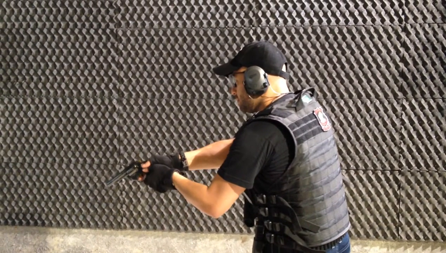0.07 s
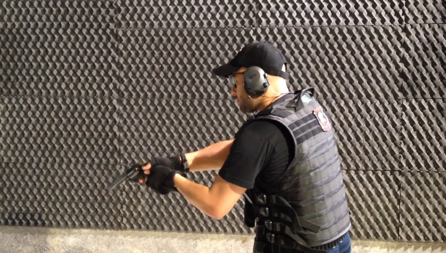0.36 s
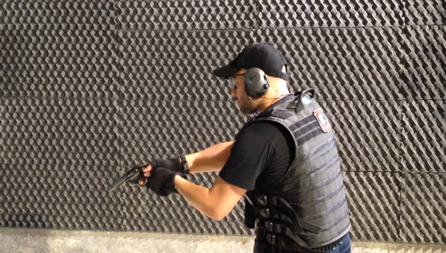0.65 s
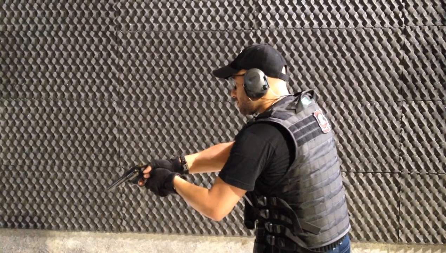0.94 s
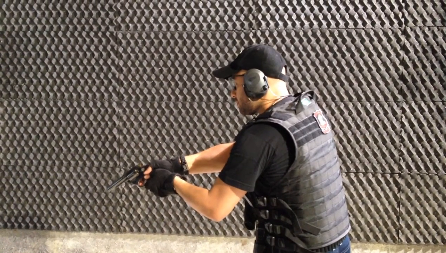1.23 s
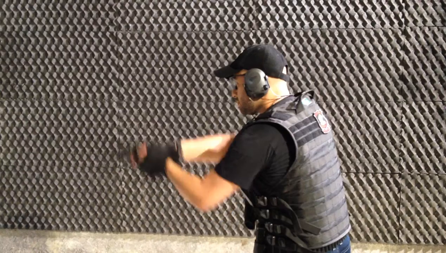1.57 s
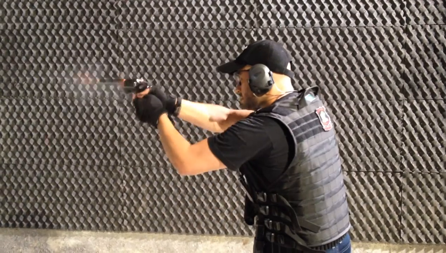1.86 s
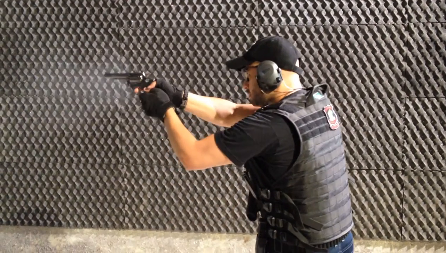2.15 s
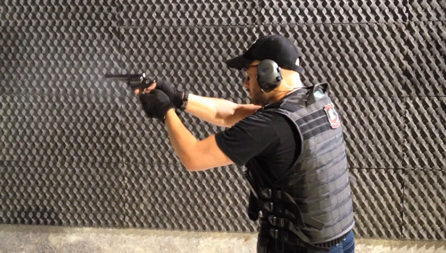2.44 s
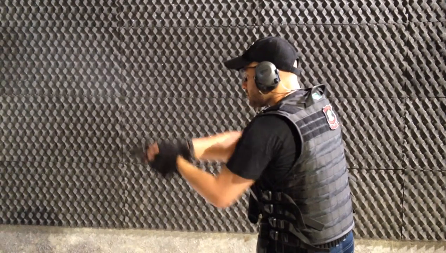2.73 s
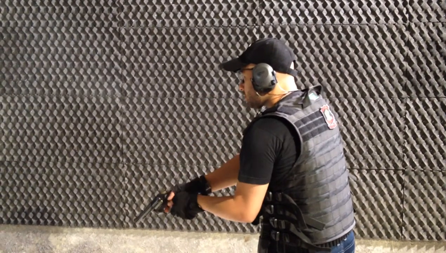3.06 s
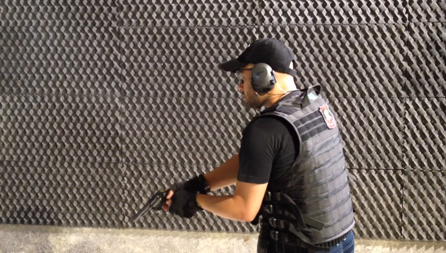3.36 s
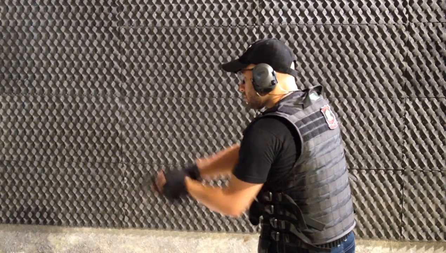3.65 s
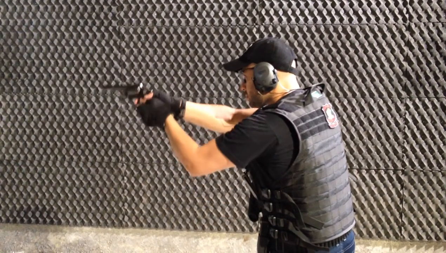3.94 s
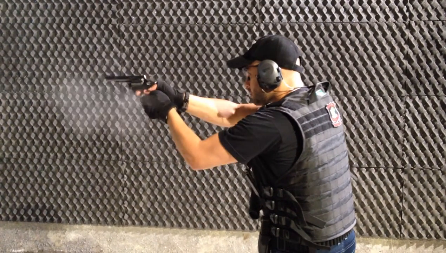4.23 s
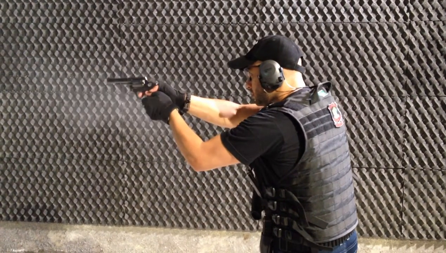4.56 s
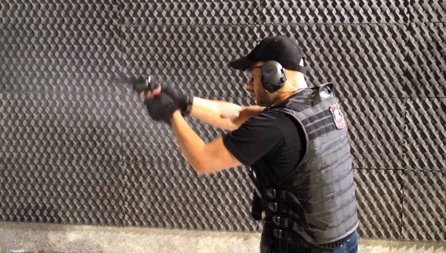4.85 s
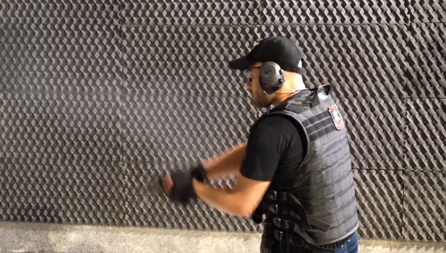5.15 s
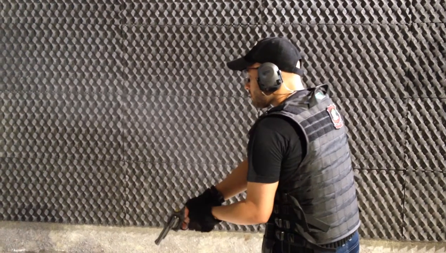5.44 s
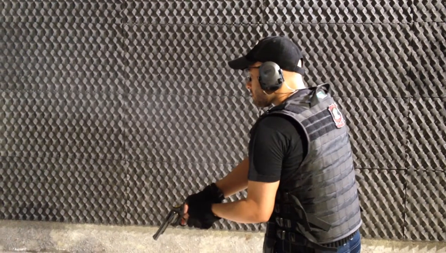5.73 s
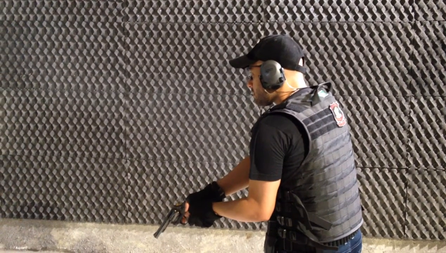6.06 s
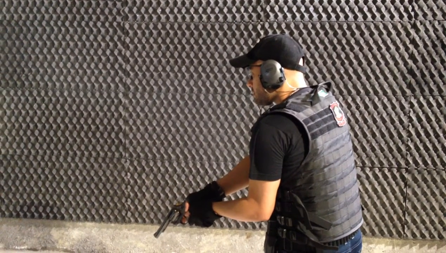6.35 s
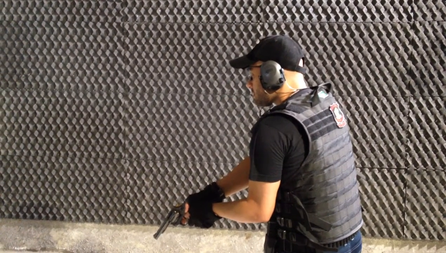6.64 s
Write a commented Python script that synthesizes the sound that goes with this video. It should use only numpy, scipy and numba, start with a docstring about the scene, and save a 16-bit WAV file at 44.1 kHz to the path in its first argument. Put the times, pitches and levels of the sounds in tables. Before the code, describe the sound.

A revolver fires once, then three times in quick succession, each blast echoing through an indoor range over steady ventilation.

```python
"""Revolver in an indoor range

One shot, then three in a row, over the steady rush of the ventilation. The hammer clicks just
before each blast; nearby surfaces throw the blast back, then the long hall swells and dies away.
The small microphone rings and overloads; its gain control turns the sound down, then slowly up."""
import sys
import numpy as np
from scipy import signal
from scipy.fft import rfft, irfft
from scipy.io import wavfile
from scipy.ndimage import uniform_filter1d
from numba import njit

SR = 44100
rng = np.random.default_rng(int(sys.argv[2]) if len(sys.argv) > 2 else 0)


def generate_wav(signal):
    """Clip the signal to [-1, 1] and save it as 16-bit WAV at the path in sys.argv[1]."""
    frames = np.transpose(np.atleast_2d(signal))
    scaled = np.clip(frames, -1, 1) * 32767
    pcm = np.round(scaled).astype(np.int16)
    wavfile.write(sys.argv[1], SR, pcm)


N = 295029
TIME = np.arange(N) / SR

# Tone of the ventilation: (frequency [Hz], relative level [dB])
VENT_TONE = [(30, -102), (55, -91), (80, -85.5), (115, -66.5), (170, -71.5), (218, -57.5), (270, -66),
             (440, -67.5), (620, -74.5), (900, -75.5), (1500, -84), (2600, -86.5), (3700, -89),
             (5200, -114)]
# Slow rise and fall of the air flow: (time [s], level change [dB])
AIR_SWELL = [(0, 3), (1.0, 4), (1.8, 2.5), (3.1, 0), (3.9, -0.5), (5.9, -1.5), (6.7, 1)]
# Microphone hiss: (frequency [Hz], level [dB per Hz])
MIC_HISS = [(3000, -112), (6000, -110), (8700, -108), (11000, -112), (15500, -115)]
# The hall's lingering sound: (frequency [Hz], relative level [dB], time to fade 60 dB [s], build-up [s])
HALL_REVERB = [(50, -49, 0.6, .08), (89, -57, 1.2, .1), (130.8, -23.5, 1.16, 0.11),
               (210, -17.5, 1.314, 0.14), (430, -10, 1.058, 0.11), (694, -14.5, 0.9, 0.1),
               (990, -15.5, 0.94, 0.088), (1420, -28, 0.9, 0.031), (2500, -27, 0.79, 0.027),
               (3960, -29, 0.67, 0.016), (5400, -45, .62, 0.0085), (7600, -41, 0.53, .01),
               (10700, -48, 0.45, .01), (16000, -45.5, 0.31, .01)]
# Tones that ring between the hall's walls: (frequency [Hz], relative level [dB])
STANDING_WAVES = [(156.1, -42), (183.0, -49.5), (215.3, -23), (247.6, -49.5), (285.3, -23), (441.4, -40),
                  (570.6, -56), (656.8, -37.5), (732.1, -33), (915.2, -34.5), (1141, -37)]
# Tone of the echoes off the near walls and floor: (frequency [Hz], gain [dB])
ECHO_TONE = [(60, -20.5), (200, -8), (450, 1), (1200, 2), (2700, 1.5), (4000, 0.5), (5500, -10),
             (9000, -29.5), (15000, -19)]
# The four shots: (time [s], shot gain [dB], extra gain of the near echoes [dB])
SHOT_LIST = [(1.9033, -0.5, -4.5), (4.0506, -1, -4.5), (4.3903, -1.5, -2), (4.7024, -1, -3.5)]


def from_db(db):
    """Turn decibels into a factor to multiply by."""
    return 10 ** (np.asarray(db) / 20)


def look_up(hz, table, column=1):
    """Read between a table's rows, with frequency spaced in octaves."""
    table = np.array(table, float)
    return np.interp(np.log(np.maximum(hz, 1)), np.log(table[:, 0]), table[:, column])


def white_noise(count):
    """Noise with a power of 1 per Hz."""
    return rng.standard_normal(count) * np.sqrt(SR / 2)


def shape_tone(x, table, size=8192):
    """Filter x with a table of (frequency [Hz], gain [dB])."""
    gains = from_db(look_up(np.fft.rfftfreq(size, 1 / SR), table))
    cepstrum = irfft(np.log(gains))
    # Fold it so the filter never rings before the sound arrives.
    cepstrum[1:size // 2] *= 2
    cepstrum[size // 2 + 1:] = 0
    response = irfft(np.exp(rfft(cepstrum)))
    return signal.fftconvolve(x, response)[:len(x)]


def fade(t, t60):
    """A smooth fade that is 60 dB down after t60 seconds."""
    return np.exp(-np.log(1000) * t / t60)


def add(out, start_s, x):
    """Mix x into out at the given time."""
    i = int(start_s * SR)
    out[i:i + len(x)] += x[:N - i]


def ventilation(flutter_db=1.27, smooth_samples=5000):
    """Air rushes through the ducts; its swirls make the level waver."""
    drift = uniform_filter1d(rng.standard_normal(N), smooth_samples)
    drift = uniform_filter1d(drift, smooth_samples)
    swell_db = np.interp(TIME, *np.transpose(AIR_SWELL))
    return shape_tone(white_noise(N), VENT_TONE) * from_db(swell_db + flutter_db * drift / drift.std())


def hall_reverb(standing_db=24, standing_t60=1.357, standing_build_s=0.17):
    """The hall answers a blast: low sounds arrive late and stay, high ones die first."""
    t = TIME[:2 * SR]
    octave = np.log2(np.maximum(np.fft.rfftfreq(len(t), 1 / SR), 1))
    spectrum, reverb = rfft(white_noise(len(t))), 0
    for centre in np.arange(5, 14.2, .25):  # bands a quarter of an octave apart
        hz = 2 ** centre
        band = irfft(spectrum * np.maximum(1 - 4 * abs(octave - centre), 0))
        db, t60, build_s = (look_up(hz, HALL_REVERB, column) for column in (1, 2, 3))
        build = 1 - np.exp(-(t / build_s) ** 2)
        reverb = reverb + band * from_db(db) * fade(t, t60) * build
    tones = sum(from_db(db) * np.sin(2 * np.pi * (hz * t + rng.random())) for hz, db in STANDING_WAVES)
    build = 1 - np.exp(-(t / standing_build_s) ** 2)
    return reverb + from_db(standing_db) * tones * fade(t, standing_t60) * build


def near_echoes(gain_db=17, per_second=700, scatter_gain=0.56, t60=.42):
    """The blast bounces back in separate slaps; scatter from foam wedges fills the gaps."""
    t = TIME[:SR // 2]
    chance = per_second / SR
    slaps = (rng.random(len(t)) < chance) * rng.standard_normal(len(t)) / np.sqrt(chance)
    scatter = scatter_gain * rng.standard_normal(len(t))
    return from_db(gain_db) * shape_tone(slaps + scatter, ECHO_TONE) * fade(t, t60)


def hammer_click(ring_hz=2230, ring_db=-20, ring_t60=.025, snap_db=-28, snap_t60=0.1):
    """The hammer hits the cartridge's primer: a steel ring and a dry snap."""
    t = TIME[:SR // 10]
    ring = from_db(ring_db) * np.sin(2 * np.pi * ring_hz * t) * fade(t, ring_t60)
    snap = from_db(snap_db) * shape_tone(rng.standard_normal(len(t)), ECHO_TONE) * fade(t, snap_t60)
    return ring + snap


def muzzle_blast(gain_db=36, push_s=0.000099):
    """The bang itself: air pressure jumps up, then drops into a short suction."""
    progress = TIME[:SR // 100] / push_s
    return from_db(gain_db) * (1 - progress) * np.exp(-progress)


def scene(hammer_lead_s=0.011):
    """Every shot sets off the same hall; the near echoes change as the gun moves."""
    out, reverb = ventilation(), hall_reverb()
    for start_s, shot_db, echo_db in SHOT_LIST:
        add(out, start_s - hammer_lead_s, hammer_click())
        add(out, start_s, from_db(shot_db) * muzzle_blast())
        add(out, start_s, from_db(shot_db + echo_db) * near_echoes())
        add(out, start_s, from_db(shot_db) * reverb)
    return out[None]


def microphone(x, ring_hz=2680, width_hz=420, ring_db=5):
    """The microphone's opening rings at one pitch, and its amplifier hisses."""
    b, a = signal.iirpeak(ring_hz, ring_hz / width_hz, fs=SR)
    return x + from_db(ring_db) * signal.lfilter(b, a, x) + shape_tone(white_noise(N), MIC_HISS)


@njit
def gain_control(x, threshold=0.39, deepest_db=12.0, down_db_per_s=6000.0, up_db_per_s=36.2):
    """Turn the sound down fast while it is too loud, then let it creep back up."""
    cut_db, out = 0., np.empty(len(x))
    for i in range(len(x)):
        if abs(x[i]) * 10 ** (-cut_db / 20) > threshold:
            cut_db = min(cut_db + down_db_per_s / SR, deepest_db)
        else:
            cut_db = max(cut_db - up_db_per_s / SR, 0.)
        out[i] = x[i] * 10 ** (-cut_db / 20)
    return out


def record(dry, ceiling=.71, hardness=2.93, top_hz=15500):
    """The sound passes the microphone and gain control, overloads and loses its highest treble."""
    x = gain_control(microphone(dry[0]))
    x = x / (1 + abs(x / ceiling) ** hardness) ** (1 / hardness)  # overload rounds off the peaks
    low_pass = signal.ellip(10, .1, 80, top_hz, fs=SR, output="sos")
    return signal.sosfiltfilt(low_pass, x)[None]


dry = scene()
out = record(dry)
generate_wav(out)
```